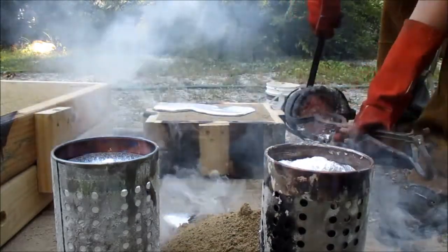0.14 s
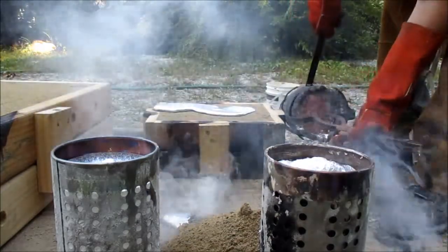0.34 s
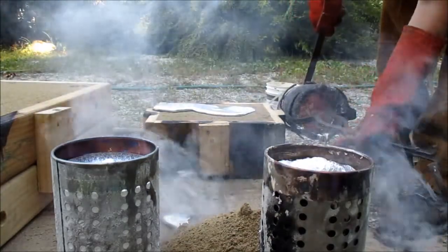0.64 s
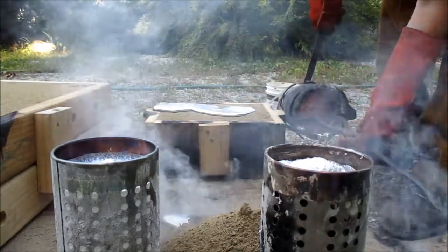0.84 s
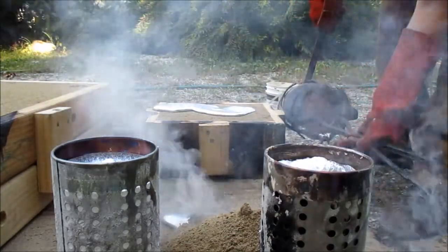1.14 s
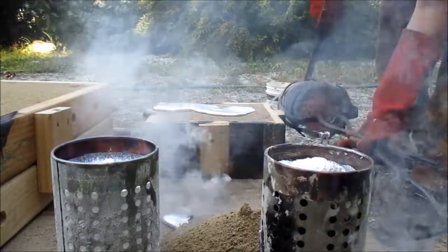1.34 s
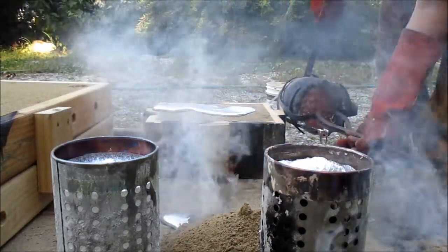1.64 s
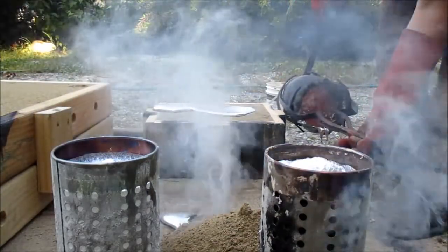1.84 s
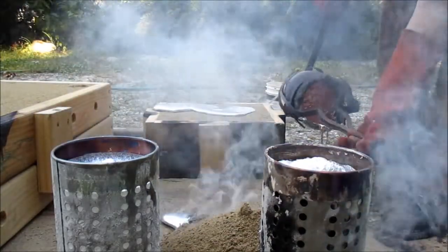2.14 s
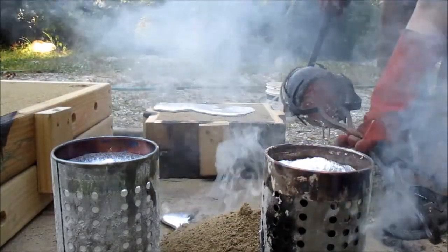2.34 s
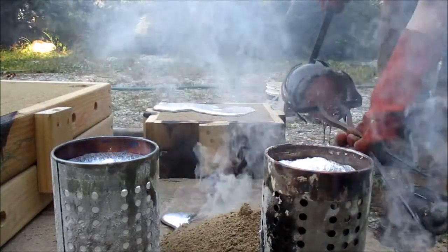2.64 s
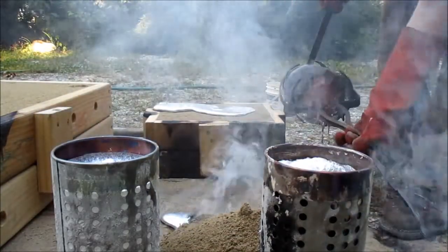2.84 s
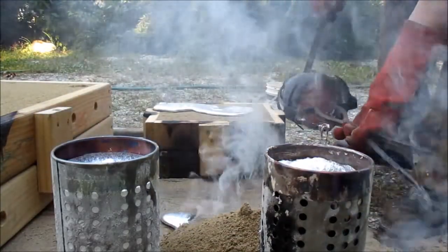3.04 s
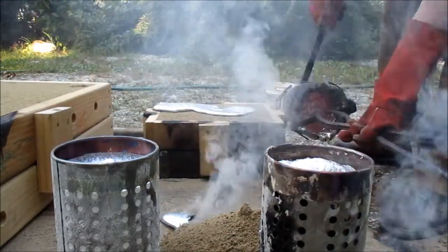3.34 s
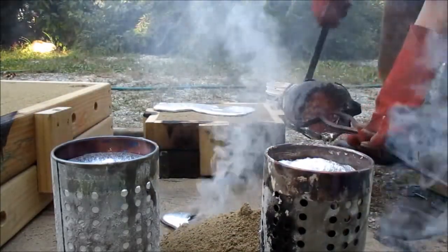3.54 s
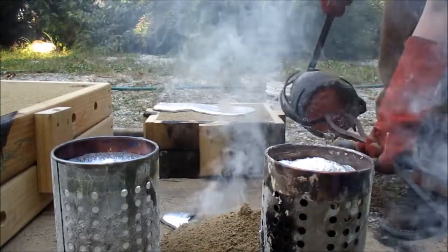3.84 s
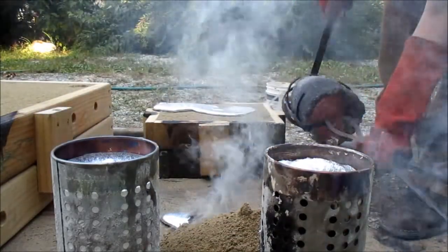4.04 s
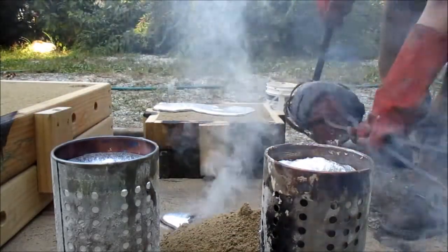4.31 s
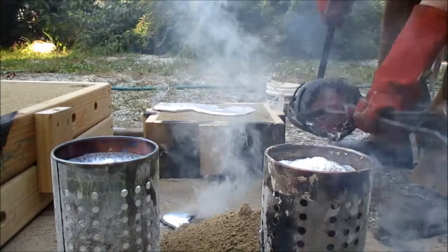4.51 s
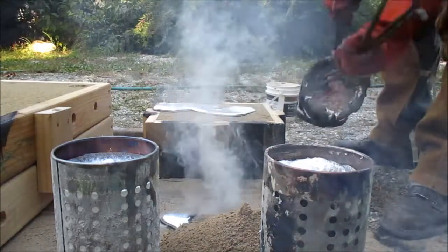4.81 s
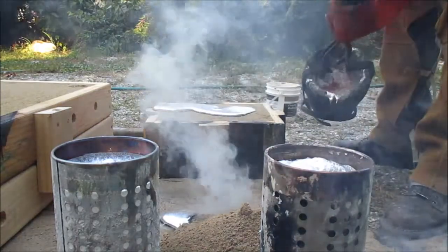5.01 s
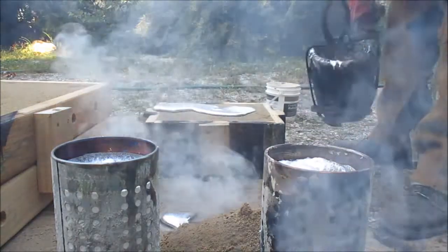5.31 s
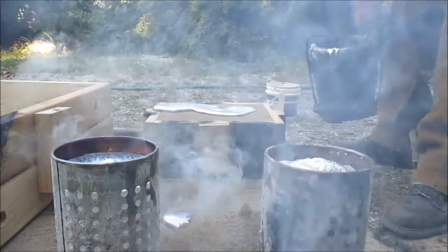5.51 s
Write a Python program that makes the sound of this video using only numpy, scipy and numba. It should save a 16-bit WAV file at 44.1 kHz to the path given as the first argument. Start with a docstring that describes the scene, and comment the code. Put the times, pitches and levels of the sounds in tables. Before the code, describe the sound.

A propane burner fires a small foundry furnace in a backyard, already at full roar and never stopping. The sound is a dense, hollow low boom that flutters unevenly, topped by a quieter whistling rush and hiss of gas. A tiny steel tick near one second, brief low thumps of flame midway and later, then a quick double clink near the end. Single camera microphone a few metres away, overloaded and compressed.

```python
"""A propane burner fires a small foundry furnace in a backyard, heard from a few metres away.
From the start the flame booms, noise in chamber resonances, and the gas jet rings its tube and hisses.
Near 1 s steel tools clink as a crucible is handled: noise cracks over decaying sines.
Near 3.1 and 4.7 s the flame puffs, a short low sine each; the camera's gain ducks at loud peaks.
Near 5.2 s the steel clinks twice more in quick succession and rings longer."""
import sys
import numpy as np
from scipy import signal
from scipy.fft import rfft, irfft
from scipy.io import wavfile
from scipy.ndimage import uniform_filter1d
from numba import njit

SR = 44100
rng = np.random.default_rng(int(sys.argv[2]) if len(sys.argv) > 2 else 0)


def materialize(psi):
    """Save the field psi as 16-bit PCM at rate SR to the path in sys.argv[1].

    A 1-D psi becomes a single channel; in a 2-D psi each row is a channel.
    """
    bounded = np.clip(np.atleast_2d(psi).T, -1, 1)
    quanta = np.round(bounded * 32767).astype(np.int16)
    wavfile.write(sys.argv[1], SR, quanta)


N = 250047
TIME_S = np.arange(N) / SR
FREQS_HZ = np.maximum(np.arange(N // 2 + 1) * SR / N, 1)


def undb(db):
    """Decibels to gain."""
    return 10 ** (np.asarray(db) / 20)


def curve(points, column=1):
    """One column of a table over time, joined by straight lines."""
    columns = np.transpose(points)
    return np.interp(TIME_S, columns[0], columns[column])


def noise():
    """White noise at 0 dB per Hz."""
    return rng.standard_normal(N) * np.sqrt(SR / 2)


def walk(rate_hz):
    """Smooth chance with zero mean and unit spread, changing about rate_hz times a second."""
    y = irfft(rfft(noise()) * np.exp(-(FREQS_HZ / rate_hz) ** 2), N)
    return (y - y.mean()) / y.std()


def below(x, hz):
    """The part of a sound under hz."""
    return irfft(rfft(x) / (1 + (FREQS_HZ / hz) ** 16), N)


EVEN_S, EVEN_SHARE = .13, .65  # swells longer than EVEN_S lose this share of their dB


def steadied(x):
    """Evens out the slow loudness swells of a noise, keeps the quick flutter."""
    power = uniform_filter1d(x ** 2, int(EVEN_S * SR))
    power = uniform_filter1d(power, int(EVEN_S * SR / 2))
    return x * (power.mean() / power) ** (EVEN_SHARE / 2)


def turbulence(points):
    """Noise shaped by a table of (Hz, dB per Hz), silent below its first row."""
    hz, db = np.transpose(points)
    spectrum_db = np.interp(np.log(FREQS_HZ), np.log(hz), db)
    gain = undb(spectrum_db) * (FREQS_HZ >= hz[0])
    return irfft(rfft(noise()) * gain, N)


def resonance(hz, width_hz, shift_hz):
    """A steep-sided air resonance driven by turbulence, 6 dB down at width_hz; shift_hz moves its centre."""
    detuning = (FREQS_HZ - hz ** 2 / FREQS_HZ) / (2 * width_hz)
    ring = np.fft.ifft(rfft(noise()) / (1 + 1j * detuning) ** 2, N)  # one-sided spectrum: complex ring
    phase = 2 * np.pi * np.cumsum(shift_hz * np.ones(N)) / SR
    return 2 * np.real(ring * np.exp(1j * phase))


EDDY_RATE_HZ = 11


def cavity(modes, drift, bend=0, flicker_db=0):
    """All resonances of a cavity move together as its gas heats and cools; eddies shake each on its own."""
    out = np.zeros(N)
    for hz, width_hz, db in modes:
        level_db = db + flicker_db * walk(EDDY_RATE_HZ)
        shift_hz = hz * (drift + bend * walk(EDDY_RATE_HZ))
        out += undb(level_db) * resonance(hz, width_hz, shift_hz)
    return out


def wandering(points, width_hz, db, waver_hz):
    """A wavering resonance whose pitch and level follow a table of (s, Hz, dB over db)."""
    hz = curve(points) + waver_hz * walk(EDDY_RATE_HZ)
    ring = steadied(resonance(hz.mean(), width_hz, hz - hz.mean()))
    return undb(db + curve(points, column=2)) * ring


# Broad combustion roar. Each row: frequency in Hz, level in dB per Hz before the level curves.
ROAR = [(20, -80), (32, -73), (55, -66.5), (90, -50.5), (130, -42.5), (200, -41.5), (285, -45),
        (360, -49.5), (500, -49.5), (620, -54.5), (800, -63), (1100, -70), (1750, -83), (3000, -107)]
# Furnace chamber resonances. Each row: frequency in Hz, half-width in Hz, dB per Hz before the level curves.
CHAMBER = [(191.3, 12.3, -39.5), (232.4, 11.6, -35.5), (248.8, 14, -37), (268.3, 9.4, -41), (328, 9, -42.5),
           (364.5, 8.9, -44.5), (402.3, 14.2, -42.5), (452.5, 30.3, -45.5), (578, 57, -60),
           (644, 18, -57.5), (734, 61, -62), (917, 47, -59.5), (1010, 30, -64.5)]
# Uneven loudness of the low boom, one chance course. Each row: time in seconds, gain in dB.
BOOM_LEVEL = [(0, 2), (.25, 0), (.37, 3), (.55, -0.5), (.68, 1.5), (.78, -1), (1.02, 1.5), (1.18, 1),
              (1.33, 0.5), (1.62, -1.5), (1.78, 1.9), (1.92, -3), (2.05, 3.5), (2.35, 0.5), (2.48, -.5),
              (2.7, 2), (2.97, -0.5), (3.12, 3), (3.22, -1), (3.38, 0), (3.6, 1.8), (3.8, -0.5), (4.0, 1),
              (4.24, 2.2), (4.38, -.7), (4.6, 1.4), (4.9, 0.5), (5.12, 1.5), (5.3, 2), (5.48, -1.3),
              (5.67, 3.5)]
# Loudness of the middle of the roar. Each row: time in seconds, gain in dB.
MIDDLE_LEVEL = [(0, -2), (.2, -0.5), (.5, 1), (.75, -1), (1.35, 1.5), (1.62, 2.5), (1.8, -1.5), (2.1, 1.5),
                (2.7, 0.5), (3.2, 0), (3.55, 1.5), (3.92, 2), (4.25, 0.5), (4.6, 0.5), (4.9, -1.5),
                (5.3, 0), (5.67, -1.8)]
# Loudness of the rush above the middle. Each row: time in seconds, gain in dB.
RUSH_LEVEL = [(0, 0.5), (.42, 1.5), (.6, -1.2), (1.1, 0.2), (2.2, 1), (2.7, 1), (3.1, 0.2), (3.75, 1.1),
              (4.0, -1.2), (4.55, 1.2), (5.0, 0.5), (5.67, 0)]
MIDDLE_FROM_HZ, MIDDLE_TO_HZ = 327, 560
CHAMBER_DRIFT, CHAMBER_BEND = 0.0048, .008  # shares of pitch
CHAMBER_DRIFT_RATE_HZ, CHAMBER_FLICKER_DB = 2.22, 1.0


def roar():
    """Combustion noise and chamber resonances; boom, middle and rush waver in loudness on their own."""
    drift = CHAMBER_DRIFT * walk(CHAMBER_DRIFT_RATE_HZ)
    sound = turbulence(ROAR) + cavity(CHAMBER, drift, CHAMBER_BEND, CHAMBER_FLICKER_DB)
    boom = below(sound, MIDDLE_FROM_HZ)
    body = below(sound, MIDDLE_TO_HZ)
    middle, rush = body - boom, sound - body
    low = steadied(boom) * undb(curve(BOOM_LEVEL)) + steadied(middle) * undb(curve(MIDDLE_LEVEL))
    return low + rush * undb(curve(RUSH_LEVEL))


# Strongest chamber resonance. Each row: time in seconds, pitch in Hz, level in dB over THROAT_DB.
THROAT = [(0, 314.6, 1), (.28, 311.8, 0), (.42, 316.3, 4.5), (.56, 324.6, 4), (.78, 318.6, -7.5),
          (.88, 321, -2), (1.05, 313.7, 0.5), (1.3, 314.7, -0.5), (1.45, 315.2, -3.5), (1.72, 316.4, 4),
          (1.92, 314, -2), (2.0, 320.9, -2), (2.12, 316.7, 3.5), (2.38, 309.8, -1), (2.52, 310.9, -5.5),
          (2.78, 320.1, -3), (2.92, 322, 3.5), (3.1, 310.1, 3), (3.28, 319.9, -1.5), (3.42, 315.6, -8),
          (3.53, 320.3, 3), (3.75, 314.6, -1), (4.02, 313.8, -4.5), (4.15, 318.2, 4.5), (4.36, 318.8, -9),
          (4.46, 316.7, 0.5), (4.62, 310.2, 0.5), (4.76, 317.7, 2.5), (4.95, 321.3, -3.5),
          (5.32, 314.6, -2.5), (5.48, 311.7, 4.5), (5.67, 309.3, -4)]
# Higher chamber resonance. Each row: time in seconds, pitch in Hz, level in dB over OVERTONE_DB.
OVERTONE = [(0, 469, 6.5), (3.35, 466.1, -8), (3.55, 465, 8), (3.75, 470.2, 8), (3.95, 474, 7.5),
            (4.1, 482.2, 6.5), (4.25, 472, -6), (5.67, 467.2, -4.5)]
THROAT_WIDTH_HZ, THROAT_DB = 13.3, -32  # dB per Hz before the level curve
OVERTONE_WIDTH_HZ, OVERTONE_DB = 19.3, -48


def hollow(waver_hz=3):
    """The strongest chamber resonance swells and breaks up; a higher one fades, then takes hold for a while."""
    throat = wandering(THROAT, THROAT_WIDTH_HZ, THROAT_DB, waver_hz)
    return throat + wandering(OVERTONE, OVERTONE_WIDTH_HZ, OVERTONE_DB, waver_hz)


FLUTTER_RATE_HZ, FLUTTER_DB = 20, .7


def flame(level_db):
    """Combustion roars and booms in the chamber, and the whole flame flutters."""
    return (roar() + hollow()) * undb(level_db + FLUTTER_DB * walk(FLUTTER_RATE_HZ))


# Lowest strong burner resonance. Each row: time in seconds, pitch in Hz, level in dB over MOUTH_DB.
MOUTH = [(0.0, 1365, 0.5), (.25, 1350, -1), (.44, 1393, 3), (.66, 1406, -0.5), (1.07, 1436, 0.5),
         (1.3, 1380, 2), (1.57, 1405, -2), (1.78, 1433, 1.5), (2.15, 1356, -2), (2.32, 1368, 1.5),
         (2.55, 1339, -0.5), (3.0, 1288, 0.5), (3.5, 1374, 0.5), (3.82, 1335, 2.5), (4.1, 1336, -1),
         (4.4, 1303, 3), (4.75, 1319, .5), (5.25, 1323, 1.5), (5.67, 1308, 0)]
# Burner tube resonances. Each row: frequency in Hz, half-width in Hz, dB per Hz before the level curve.
TUBE = [(1581, 78, -70.5), (2079, 126, -61.5), (2961, 76, -67), (3617, 39, -69.5), (3735, 194, -75.5),
        (3840, 32, -75), (4062, 52, -71), (4190, 98, -79.5), (4470, 150, -71), (4865, 86, -79),
        (5250, 66, -76.5), (6130, 58, -80.5), (7070, 77, -79), (12200, 130, -86)]
# Hiss of the gas jet. Each row: frequency in Hz, level in dB per Hz before the level curve.
HISS = [(100, -120), (900, -91), (1500, -86), (2500, -76.5), (3300, -79.5), (4400, -90), (5000, -100),
        (5700, -86.5), (6500, -85.5), (8000, -84.5), (10200, -88.5), (11700, -86.5), (12800, -92.5),
        (15700, -93.5)]
MOUTH_WIDTH_HZ, MOUTH_DB, MOUTH_WAVER_HZ = 117, -58, 28
TUBE_DRIFT, TUBE_BEND = 0.004, .005  # shares of pitch
TUBE_DRIFT_RATE_HZ, TUBE_FLICKER_DB = 7.04, .8
TUBE_FLUTTER_RATE_HZ, TUBE_FLUTTER_DB = 26, 0.66
HISS_FLUTTER_RATE_HZ, HISS_FLUTTER_DB = 39, .5


def burner(level_db):
    """The gas jet rings the burner tube and hisses at the nozzle; eddies shake both and bend the resonances."""
    mouth = wandering(MOUTH, MOUTH_WIDTH_HZ, MOUTH_DB, MOUTH_WAVER_HZ)
    drift = TUBE_DRIFT * walk(TUBE_DRIFT_RATE_HZ)
    tube = mouth + cavity(TUBE, drift, TUBE_BEND, TUBE_FLICKER_DB)
    tube = tube * undb(TUBE_FLUTTER_DB * walk(TUBE_FLUTTER_RATE_HZ))
    hiss = turbulence(HISS) * undb(HISS_FLUTTER_DB * walk(HISS_FLUTTER_RATE_HZ))
    return undb(level_db) * (tube + hiss)


# Tool contacts. Each row: start in seconds, peak in dB before the gain control, share of the steel's t60.
CLINKS = [(0.995, -31, .05), (5.2255, -32, 1.0), (5.237, -37, 1.0)]
# Steel modes. Each row: frequency in Hz, level in dB within the hit, full t60 in seconds.
STEEL = [(6352, -4, .09), (6470, -7, .06), (8699, -4.5, .1), (12800, -4, .05)]
CRACK_DB, CRACK_T60_S = -5, 0.044


def tools():
    """Each contact gives a short noise crack and rings the modes of the steel."""
    out = np.zeros(N)
    t = TIME_S[:SR // 4]
    for start_s, peak_db, share in CLINKS:
        hit = undb(CRACK_DB - 60 * t / CRACK_T60_S) * rng.standard_normal(len(t))
        for hz, mode_db, t60_s in STEEL:
            hit += undb(mode_db - 60 * t / (t60_s * share)) * np.sin(2 * np.pi * hz * t)
        hit *= undb(peak_db) / np.abs(hit).max()
        start = int(start_s * SR)
        out[start:start + len(t)] += hit[:N - start]
    return out


# Gas pockets going up in the chamber. Each row: centre in seconds, sine level in dB at full swell.
PUFFS = [(3.096, -1.5), (4.667, 2.5)]
PUFF_HZ, PUFF_HALF_S = 277, .0045


def puffs(fire):
    """A gas pocket goes up: a low sine takes over from the flame for a few cycles."""
    for centre_s, db in PUFFS:
        t = TIME_S - centre_s
        swell = np.exp(-(t / PUFF_HALF_S) ** 2)
        fire = fire * (1 - swell) + undb(db) * swell * np.sin(2 * np.pi * PUFF_HZ * t)
    return fire


# Slow loudness of flame and jet, with the camera's gain dips. Each row: time in seconds, level in dB.
FIRE_LEVEL = [(0, 0), (.25, -0.8), (.42, -0.5), (.72, -2.5), (1.1, 0), (1.5, -1.2), (2.15, 0.9),
              (2.65, -0.2), (3.05, 0), (3.35, -1.6), (3.85, 0), (4.2, -0.5), (4.5, 1.6), (4.665, 1.5),
              (4.695, 0.2), (4.85, 0), (5.25, -0.3), (5.67, -1)]
FLAME_DB, JET_DB = -0.5, 0.07  # where the level curve is at 0 dB
FLAME_SWING = 0.52  # dB of flame per dB of the level curve


def scene():
    """One level curve drives flame and jet; puffs break into the flame, tools sound over all."""
    level_db = curve(FIRE_LEVEL)
    fire = puffs(flame(FLAME_DB + FLAME_SWING * level_db))
    return (fire + burner(JET_DB + level_db) + tools())[None]


@njit
def follow(x, attack_s, release_s):
    """One-pole follower: rises quickly with x and sinks back slowly."""
    out, held = np.empty(len(x)), 0.
    for i in range(len(x)):
        held += (x[i] - held) / (SR * (attack_s if x[i] > held else release_s))
        out[i] = held
    return out


LIMIT_DB, LIMIT_ATTACK_S, LIMIT_RELEASE_S = -2.5, 0.0022, 0.41
TOP_HZ = 15730


def record(dry):
    """The camera turns itself down at loud peaks, recovers slowly, clips at full scale and cuts the top."""
    peak_db = 20 * np.log10(np.abs(signal.hilbert(dry[0])) + 1e-9)
    excess_db = np.maximum(peak_db - LIMIT_DB, 0)
    duck_db = follow(excess_db, LIMIT_ATTACK_S, LIMIT_RELEASE_S)
    clipped = np.clip(dry * undb(-duck_db), -1, 1)
    lowpass = signal.ellip(12, .1, 90, TOP_HZ, fs=SR, output="sos")
    return signal.sosfilt(lowpass, clipped)


dry = scene()
out = record(dry)
materialize(out)
```